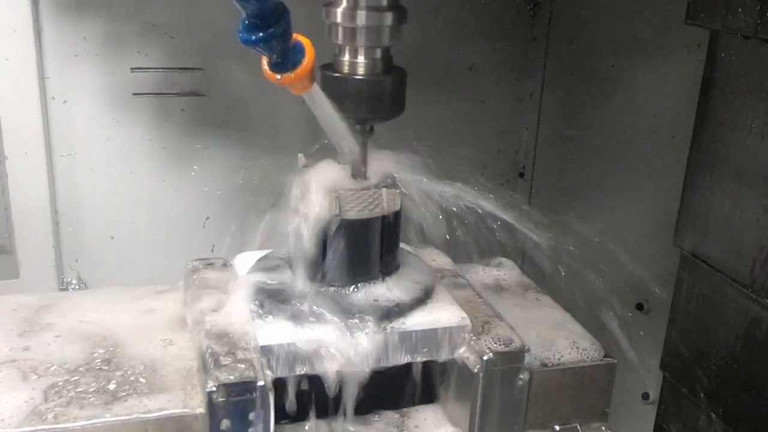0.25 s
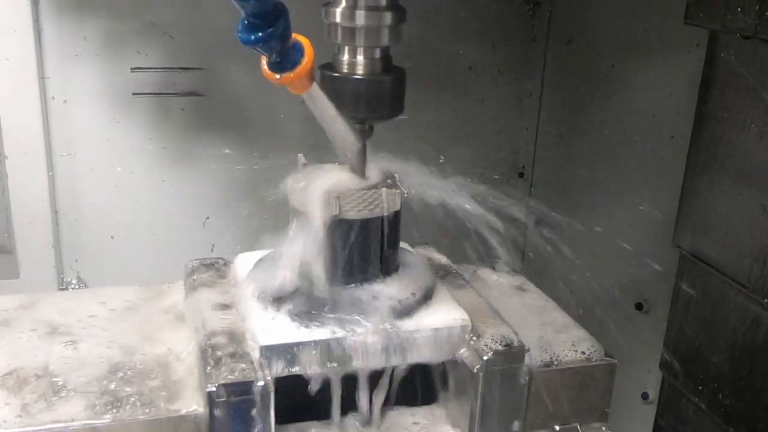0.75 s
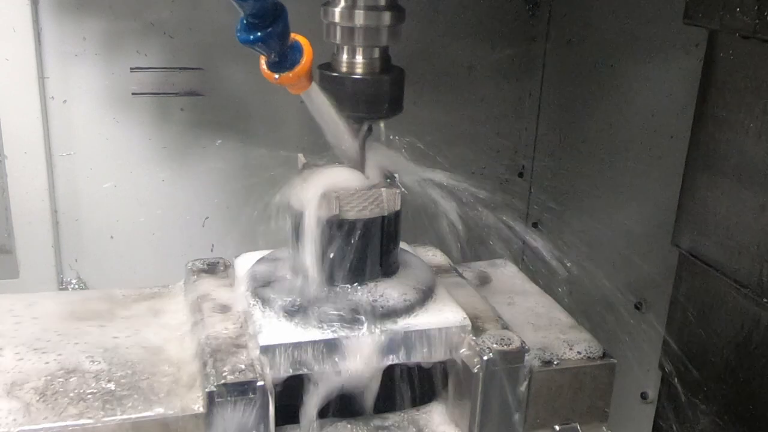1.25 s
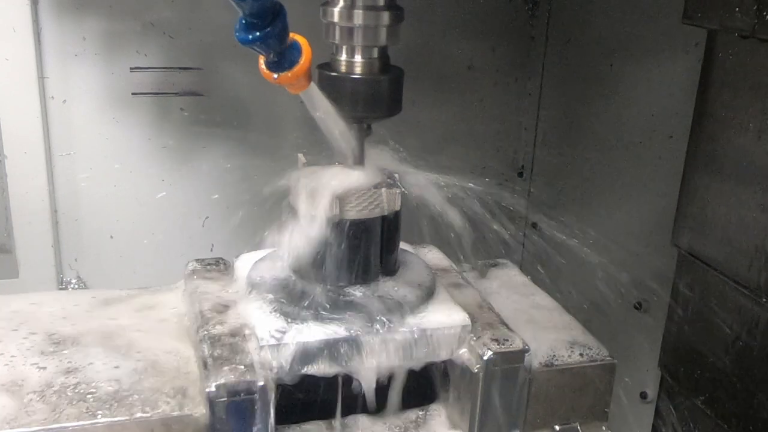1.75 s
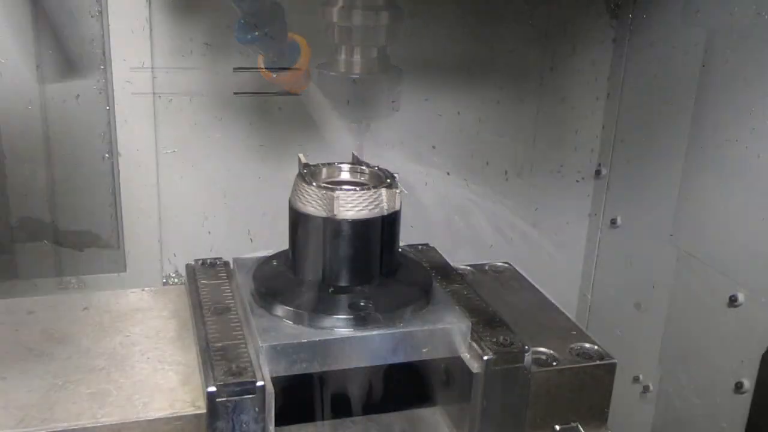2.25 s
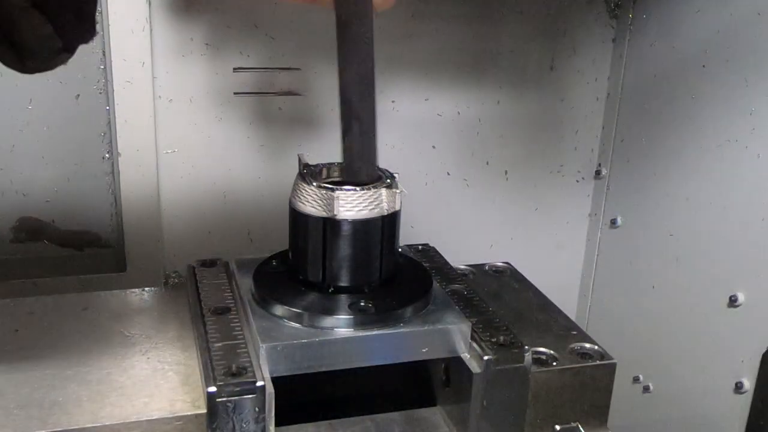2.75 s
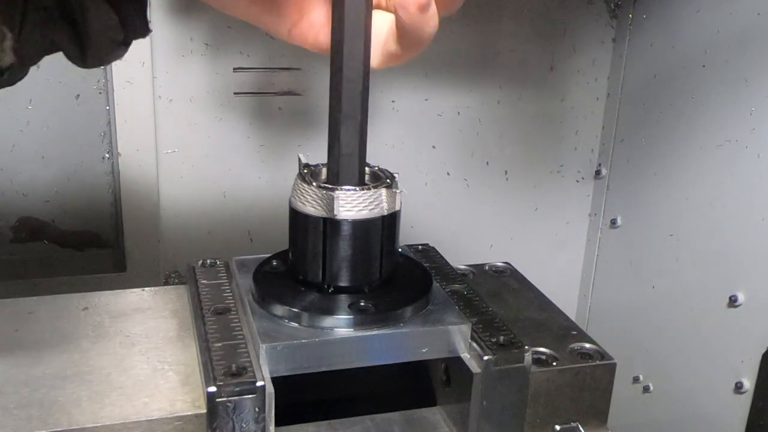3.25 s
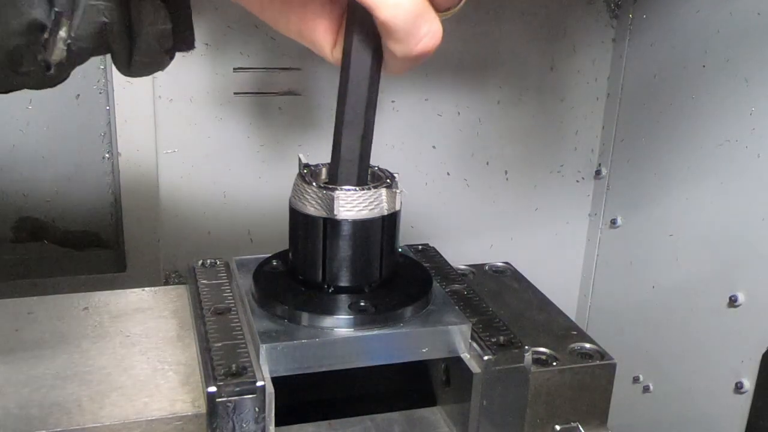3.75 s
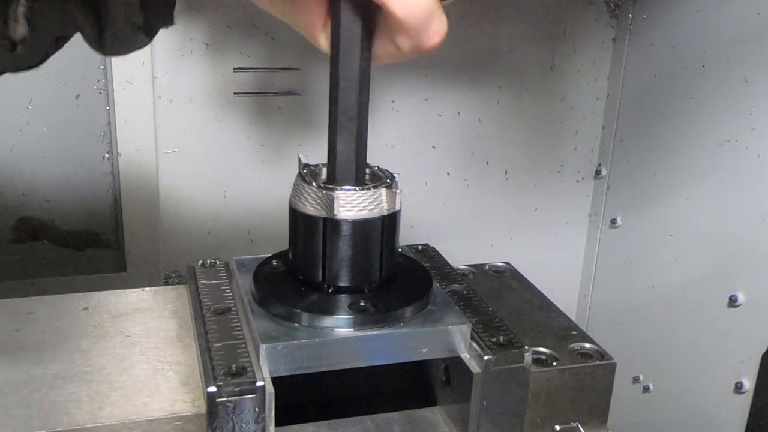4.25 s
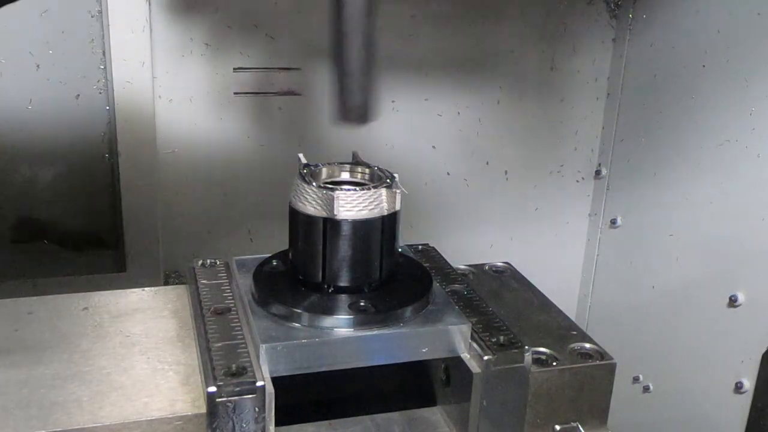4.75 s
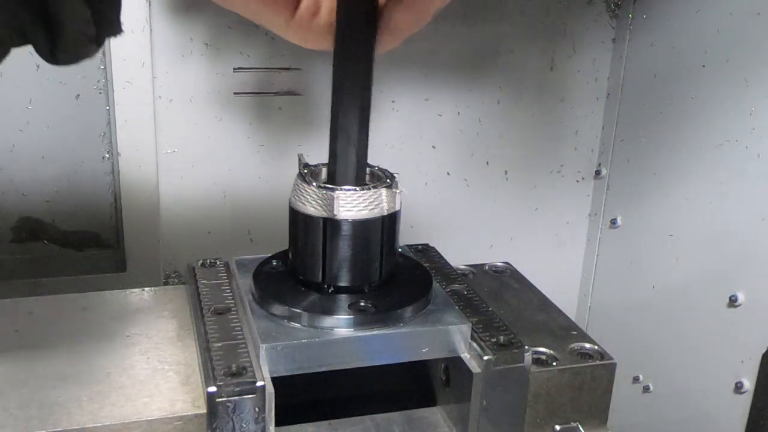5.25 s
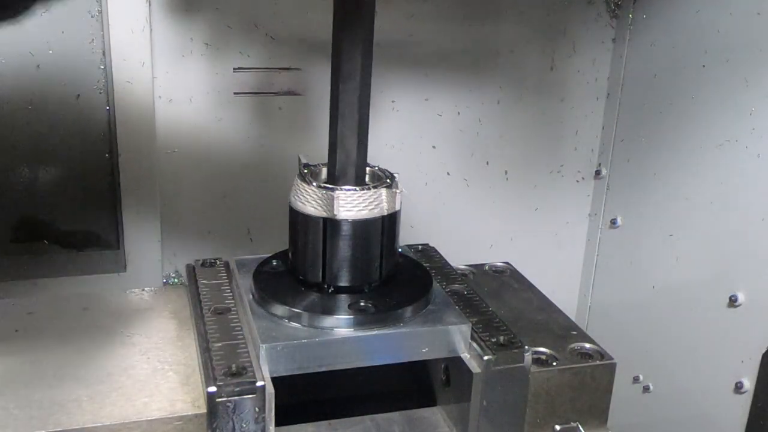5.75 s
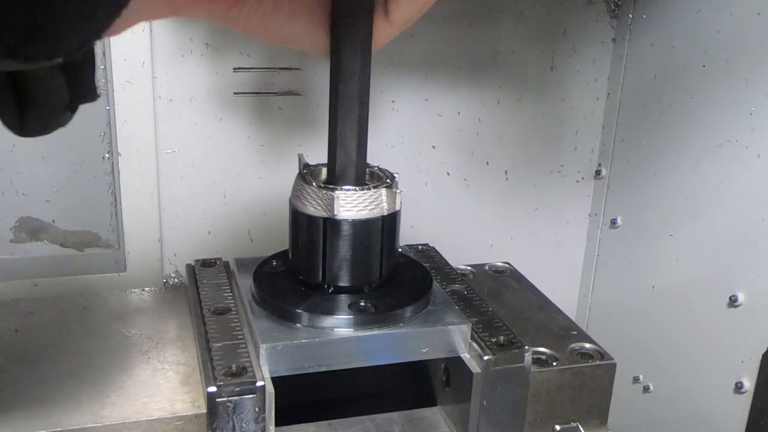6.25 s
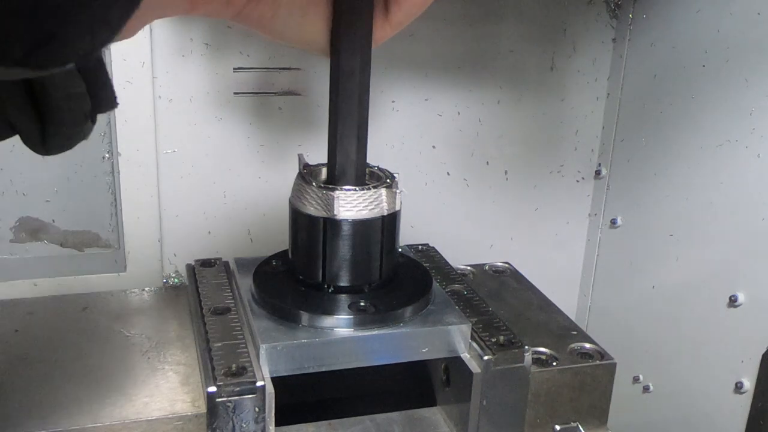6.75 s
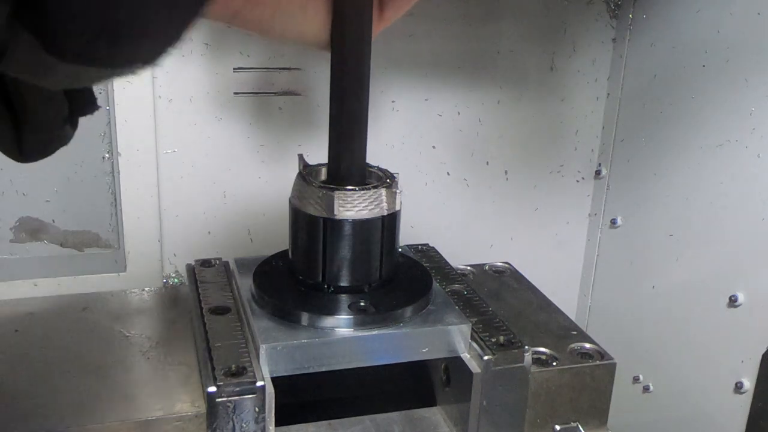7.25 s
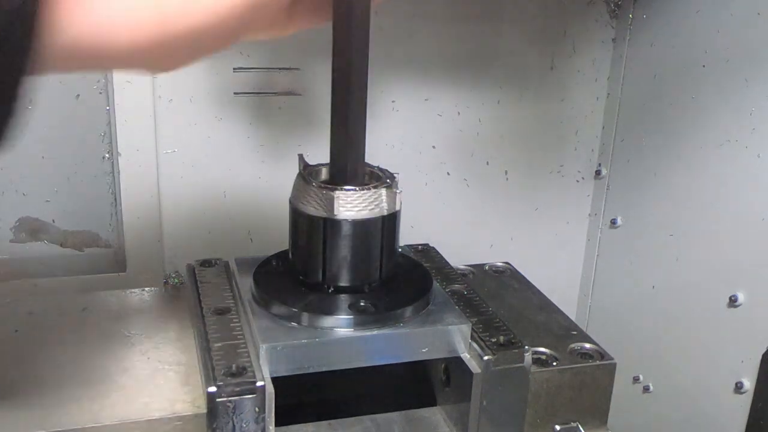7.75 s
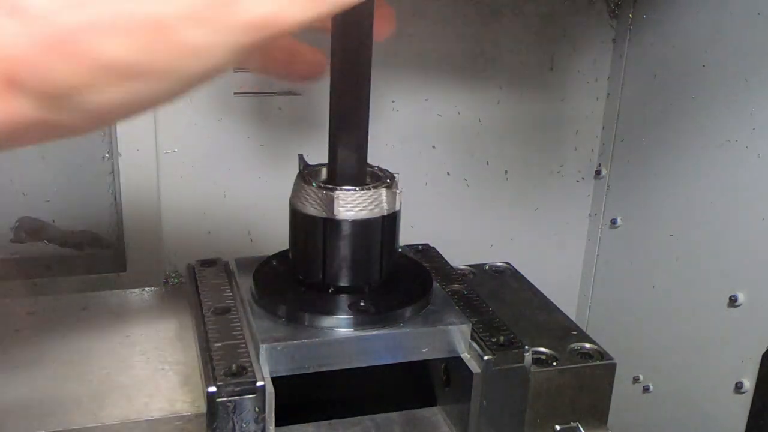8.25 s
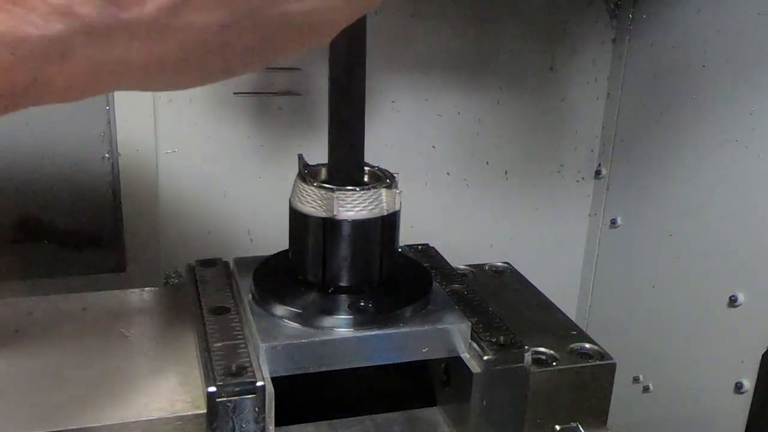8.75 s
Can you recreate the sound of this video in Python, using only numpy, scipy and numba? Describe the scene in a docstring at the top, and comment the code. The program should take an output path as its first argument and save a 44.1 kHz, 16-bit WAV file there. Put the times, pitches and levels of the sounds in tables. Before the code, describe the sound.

Inside a metal machine enclosure, a spindle sings and the cutter flutters rapidly through spraying coolant. The sound changes abruptly to whirring, bright hiss. Loud, short steel clacks and tight scrapes follow in two clusters as a key is fitted into a clamp, then sparse faint taps and rubs. Dull bumps thump throughout. The stereo microphone is close and muffled by its case, with loud hits briefly ducking the background.

```python
"""A milling machine cuts a steel part under coolant: hissing rasp, spindle tones, and a cutter mode struck every turn.
Jolts of the table thud in a camera mount and boom in sheet panels throughout; a feed axis whines as it speeds up.
The scene then switches at once to a second one, with shaped shop hiss and idle drives: a long hex key is fitted
into the clamp, its clacks and scrapes being damped modes struck by single blows and by trains of tiny slips.
A camera in a closed case hears it all; its gain control ducks each strong peak."""
import sys
import numpy as np
from scipy import signal
from scipy.fft import rfft, irfft
from scipy.io import wavfile
from scipy.ndimage import uniform_filter1d, minimum_filter1d
from numba import njit

SR = 44100
rng = np.random.default_rng(int(sys.argv[2]) if len(sys.argv) > 2 else 0)


def store_wav(level_fs):
    """Save 16-bit WAV to argv[1]."""
    pcm = np.round(np.clip(np.atleast_2d(level_fs), -1, 1) * 32767)
    wavfile.write(sys.argv[1], SR, pcm.T.astype(np.int16))


N = 397782

# rasp of the cut and the spray: freq_hz, left_db_per_hz, right_db_per_hz
RASP_SPECTRUM = [(40, -114, -106), (93, -106, -90.5), (203, -99, -102), (390, -102, -108),
                 (508, -89.5, -111), (710, -106, -103), (1034, -87, -110), (1200, -93, -98),
                 (1376, -73, -72), (1565, -64.5, -63.5), (1716, -100, -76.5), (1980, -83, -81),
                 (3380, -108, -110), (13000, -124, -126)]
# ringing of tool and part, above the rasp: freq_hz, width_hz, left_db, right_db
PART_RESONANCES = [(873, 22, 8, 5), (2585, 39, 18, 11), (2830, 140, 21, 17)]
# steady tones of the running spindle: pitch_hz, level_db
SPINDLE_TONES = [(296, -84.5), (500, -86), (894, -85), (925, -68), (980, -75.5), (1241, -71.5), (1301, -64),
                 (1350, -61.5), (1428, -56.5)]
# hiss of the shop: freq_hz, left_db_per_hz, right_db_per_hz
HISS_SPECTRUM = [(30, -114, -111), (87, -106, -100), (164, -99, -95.5), (380, -100, -101), (768, -90, -86),
                 (936, -95.5, -94), (1405, -79.5, -77.5), (1695, -69, -67), (2074, -74, -71.5),
                 (3114, -76, -80), (3565, -100, -92.5), (4520, -94.5, -108.5), (10170, -95, -97),
                 (13850, -107, -105)]
# resonances of the camera case and narrow whirring bands of the drives, above the hiss:
# freq_hz, width_hz, left_db, right_db
CASE_AND_DRIVE_BANDS = [(2017, 121, 10.5, 5.5), (2492, 59, 7.5, -2.5), (2864, 303, 6.5, 8),
                        (4307, 420, 9.5, 16), (5650, 45, 7, 7), (5887, 68, 7, 14), (5980, 730, 13.5, 12),
                        (7790, 670, 2.5, 13), (8470, 470, 7.5, 4.5), (9540, 260, 1.5, 0.5),
                        (10550, 370, 6, 9), (11300, 420, 1, -6.5), (12070, 630, -1.5, 9)]
# likeness of the two microphone ports: freq_hz, coherence (0-1)
PORT_COHERENCE = [(60, 0.2), (250, 0), (600, 0.78), (1500, 0.61), (2800, 0.97), (5600, 0.65), (10000, 0.8),
                  (14000, 0.3)]
# phase of the left port against the right: freq_hz, phase_rad
PORT_PHASE_CURVE = [(0, 0), (690, -3.4), (1210, -1.3), (1980, -4.3), (3190, -3.3), (4130, -6.9),
                    (5080, -14.3), (6120, -16.6), (7490, -10.2), (10200, -5.8), (11500, -8.2),
                    (12800, -5.0), (13500, -6.5), (14400, -6.0)]
# modes of the cutter: pitch_hz, level_db, left_over_right_db
CUTTER_MODES = [(1540.3, -27, -3.5), (2523, -57.5, 6.5)]
# jolts of the machine table that rock the camera: crest_s, level_db, loss_per_rebound_db
TABLE_JOLTS = [(0.417, -35, 18), (0.461, -39, 11), (0.853, -51, 20), (1.129, -54, 12), (2.604, -25, 39),
               (2.947, -24, 27), (3.48, -50, 25), (5.131, -28, 16), (5.396, -28, 13.5), (5.609, -38.5, 14),
               (6.21, -52, 25), (6.307, -41.5, 8), (6.559, -52, 6), (7.45, -61, 20), (7.709, -45, 18),
               (7.99, -44, 27), (8.222, -46, 20), (8.48, -58, 20), (8.69, -55, 14), (8.991, -31, 21)]
# whine of a feed axis as it speeds up: time_s, pitch_hz, level_db (before the left-right balance)
FEED_WHINE = [(0.85, 395, -82), (1.049, 452, -78), (1.27, 499, -64), (1.42, 542, -80), (1.7, 613, -84)]
# hum and whine of the idle drives: pitch_hz, left_db, right_db
DRIVE_TONES = [(280, -83, -83), (727, -77, -68), (4457, -66, -77)]
# modes of the key in the clamp: pitch_hz, swell_ms, level_db (before brightness), left_over_right_db
KEY_MODES = [(505, 5.7, -46.5, 11.5), (820, 3.2, -35, -16), (1061, 3.7, -29.5, 7), (1529, 1.95, -7, 0),
             (1640, 1.64, 4.5, -4.5), (2072, 2.1, -8.5, -35), (2510, 0.95, -30.5, 17.5),
             (2920, 0.87, -13.5, 8), (3780, 1.8, -43.5, 9), (4600, 0.99, -40, 7), (6180, 2.2, -49, -1),
             (8240, 0.098, -40, -6)]
# clacks of the key: start_s, blow_db, brightness_db_per_octave, loss_per_bounce_db
KEY_CLACKS = [(2.57, 3, -15.5, 20), (2.572, -1, 12, 16), (2.8944, 18, 7, 37), (2.9164, 9.5, 4.5, 6),
              (2.9748, 3.5, 3.5, 7.5), (3.3671, -24, -14.5, 13), (3.4457, -18.5, -4, 16),
              (3.4544, -1.5, -4, 27), (4.675, -30, -13, 9), (4.6895, -21, 11.5, 22), (5.0518, 13, 5, 22),
              (5.0678, 0, -4.5, 6), (5.09, -6, -8, 21), (5.105, 9, -1, 7.5), (5.2327, 4, -5, 4.5),
              (5.3468, 4, 0.5, 17), (5.583, -31, -20, 11), (5.7006, 2, -1.5, 18), (7.698, -25.5, -17, 18),
              (8.9623, -29, -22, 10)]
# slides of the key in the socket: start_s, length_s, right_rms_db, brightness_db_per_octave
KEY_SCRAPES = [(2.712, 0.17, -40, -22), (2.95, 0.03, -23, 0), (3.401, 0.048, -39, -17),
               (4.675, 0.019, -28.5, 4), (5.179, 0.055, -29.5, -7.5), (5.213, 0.044, -9.5, 3),
               (5.265, 0.088, -33.5, -12), (5.322, 0.064, -14, -2), (5.415, 0.057, -37.5, 3),
               (6.454, 0.15, -43, 2), (8.524, 0.12, -44.5, -7)]

CUT_END_S, TURN_S, FIRST_TURN_S = 2.16, 0.035017, 0.0228
REBOUND_S, MOUNT_HZ = 0.08, 89.8  # time between thuds of one jolt; pitch of the camera mount
BOUNCE_S, BOUNCE_SHRINK = 0.0069, 0.54  # first gap between bounces of the key; ratio of later gaps
SHANK_HZ, SHANK_DB, SHANK_T60_S = 2880, -42, 0.12  # level relative to the blow
EDGE_HZ = 14750  # upper band limit
TIME, FREQS = np.arange(N) / SR, np.fft.rfftfreq(N, 1 / SR)
LEFT = np.eye(2)[:, :1]  # picks out the left port


def amp(db):
    """Logarithmic level: decibels to amplitude gain."""
    return 10 ** (np.asarray(db) / 20)


def read(points, hz):
    """Spectral interpolation: each column of a table, read on a log-frequency axis."""
    table_hz, *columns = np.transpose(points)
    return np.array([np.interp(np.log(hz + 1), np.log(table_hz + 1), column) for column in columns])


def add(mix, start_s, sound):
    """Superposition: adds a stereo sound to the mix at the given time."""
    part = mix[:, max(round(start_s * SR), 0):][:, :sound.shape[1]]
    part += sound[:, :part.shape[1]]


def drift(rate_hz):
    """Low-passed noise: a slow random wander of unit size."""
    slow = irfft(rfft(rng.standard_normal(N)) * np.exp(-(FREQS / rate_hz) ** 2), N)
    return slow / slow.std()


def tone(hz, waver_rad):
    """Phase modulation: a sine of unit power whose phase wavers at random."""
    phase = 2 * np.pi * np.cumsum(hz * np.ones(N)) / SR
    return np.sqrt(2) * np.sin(phase + waver_rad * drift(14))


def delayed(x, ms):
    """Propagation delay: the same sound a moment later, as at the far port."""
    return np.interp(TIME - ms / 1000, TIME, x)


def noise(spectrum, humps):
    """Partial coherence: humped noise at two ports that share only part of their signal."""
    db = read(spectrum, FREQS)
    for hz, width_hz, left_db, right_db in humps:
        hump = 1 / (1 + (2 * (FREQS - hz) / width_hz) ** 2)
        db = db + np.array([[left_db], [right_db]]) * hump
    right, other = rfft(rng.standard_normal((2, N)))
    same = np.clip(read(PORT_COHERENCE, FREQS)[0], 0, 1)
    left = same * right + np.sqrt(1 - same ** 2) * other
    left = left * np.exp(1j * read(PORT_PHASE_CURVE, FREQS)[0])
    return irfft(np.array([left, right]) * amp(db), N) * np.sqrt(SR / 2)  # to dB per Hz


def cutting_rasp(throb=0.039):
    """Amplitude modulation: the rasp of cut and spray throbs once a turn."""
    bite = 1 + throb * np.cos(2 * np.pi * (TIME - FIRST_TURN_S) / TURN_S)
    return bite * noise(RASP_SPECTRUM, PART_RESONANCES)


def spindle():
    """Sum of partials: the running spindle sounds steady tones, reaching the left port late."""
    hum = sum(amp(db) * tone(hz, waver_rad=1.0) for hz, db in SPINDLE_TONES)
    return np.array([delayed(hum, ms=0.078), hum])


def shop_hiss(flutter_db=0.59):
    """Spectral shaping: hiss with humps of the camera case and whirring drives flutters slightly in level."""
    return amp(flutter_db * drift(27)) * noise(HISS_SPECTRUM, CASE_AND_DRIVE_BANDS)


def cutter():
    """Periodic excitation: a bite each turn makes the cutter's modes swell and fade at a scattered phase."""
    length_s, fullness, lag_rad = 0.035, 1.3, 1.65  # the left port lags
    uneven_db, stray_hz, slip_rad, late_s = 2.0, 9, 2.23, 0.001603  # scatter from bite to bite
    out, t = np.zeros((2, N)), np.arange(round(length_s * SR)) / SR
    swell = abs(np.sin(np.pi * t / length_s)) ** fullness
    turns = int(CUT_END_S / TURN_S) + 1
    for hz, db, left_db in CUTTER_MODES:
        for turn, (size, detune, slip, late) in enumerate(rng.standard_normal((turns, 4))):
            phase = 2 * np.pi * (hz + stray_hz * detune) * (t - length_s / 2)
            phase = phase + np.pi * turn + slip_rad * slip
            level = amp(db + uneven_db * min(size, 1) + left_db * LEFT)
            ring = level * np.sin(phase - lag_rad * LEFT)
            start_s = FIRST_TURN_S + turn * TURN_S - length_s / 2 + late_s * late
            add(out, start_s, swell * ring)
    return out


def panels(boom_db=-29, panel_hz=490, width_hz=110, lead_s=0.027, t60_s=0.31):
    """Forced resonance: sheet-metal panels boom faintly at the start of each jolt."""
    out, t = np.zeros((2, N)), np.arange(SR // 4) / SR
    band = [panel_hz - width_hz / 2, panel_hz + width_hz / 2]
    sheet = signal.butter(2, band, "bandpass", fs=SR, output="sos")
    balance_db = np.array([[3], [-3]])
    for crest_s, db, _ in TABLE_JOLTS:
        boom = signal.sosfilt(sheet, rng.standard_normal(len(t)))
        level = amp(db + boom_db - 60 * t / t60_s + balance_db)
        add(out, crest_s - lead_s, level * boom / boom.std())
    return out


def table_jolts(left_db=-14, swell_s=0.0232, sharpness=2.9, shudder_db=-18, shudder_t60_s=0.42, thuds=3):
    """Transient response: a jolt thuds in the camera mount, with weaker rebounds and an uneven shudder."""
    out, t = np.zeros((2, N)), np.arange(SR // 2) / SR
    u, pan = t / swell_s, amp(left_db * LEFT)
    thud = (u * np.exp(1 - u)) ** sharpness * np.sin(2 * np.pi * MOUNT_HZ * t)
    mount = signal.butter(2, [60, 110], "bandpass", fs=SR, output="sos")
    for crest_s, db, loss_db in TABLE_JOLTS:
        start_s = crest_s - swell_s
        shudder = signal.sosfilt(mount, rng.standard_normal(len(t)))
        level = amp(db + shudder_db - 60 * t / shudder_t60_s)
        add(out, start_s, pan * level * shudder / shudder.std())
        for rebound in range(thuds):
            add(out, start_s + rebound * REBOUND_S, pan * amp(db - rebound * loss_db) * thud)
    return out


def feed_axis():
    """Frequency glide: the feed axis whines higher as it speeds up."""
    time_s, pitch_hz, level_db = np.transpose(FEED_WHINE)
    level = amp(np.interp(TIME, time_s, level_db, -120, -120))
    whine = level * tone(np.interp(TIME, time_s, pitch_hz), waver_rad=0.27)
    return whine * amp([[3], [-4]])


def milling():
    """Superposition: all that sounds because the machine is cutting."""
    return cutter() + cutting_rasp() + spindle() + feed_axis()


def idle_drives(waver_rad_per_hz=0.00018):
    """Phase jitter: the idle drives hum and whine, higher tones wavering more."""
    return sum(amp([[left_db], [right_db]]) * tone(hz, waver_rad_per_hz * hz)
               for hz, left_db, right_db in DRIVE_TONES)


def key_ring(bright_db, scatter_hz_ms=50, lag_ms=0.18, onset=1.6, uneven_db=4.0):
    """Damped modes: the hand deadens the key in milliseconds; each contact point shifts and weights its modes."""
    age_s = np.maximum(np.arange(SR // 25) / SR - lag_ms * LEFT / 1000, 0)
    out = 0
    scatter = rng.standard_normal((len(KEY_MODES), 2))
    for (hz, swell_ms, db, left_db), (detune, weight) in zip(KEY_MODES, scatter):
        u = age_s * 1000 / swell_ms
        tilt_db = bright_db * np.log2(np.clip(hz, 900, 3600) / 1600)  # brightness pivots at 1600 Hz
        level = amp(db + uneven_db * weight + tilt_db + left_db * LEFT)
        mode_hz = hz + scatter_hz_ms * detune / swell_ms  # short-lived modes stray furthest
        out = out + level * (u * np.exp(1 - u)) ** onset * np.sin(2 * np.pi * mode_hz * age_s)
    return out


def crack(blow_db, crack_db=-62, growth=2.6, swell_ms=0.6, edge_hz=3000):
    """Nonlinear impact: the bright crack of steel on steel grows faster than the blow."""
    u = np.arange(SR // 100) / SR * 1000 / swell_ms
    highpass = signal.butter(2, edge_hz, "highpass", fs=SR)
    burst = signal.lfilter(*highpass, rng.standard_normal((2, len(u))))
    return amp(crack_db + growth * blow_db) * u * np.exp(1 - u) * burst


def clacks(rattle_db=-14, rattle_t60_s=0.042, blows=4):
    """Impulse response: a blow and ever sooner bounces, each with a fine rattle, strike the key; its shank rings on."""
    out, t = np.zeros((2, N)), np.arange(SR // 8) / SR
    shank = amp(SHANK_DB - 60 * t / SHANK_T60_S)
    shank = shank * np.sin(2 * np.pi * SHANK_HZ * t + np.pi * LEFT)  # ports in opposite phase
    for start_s, db, bright_db, loss_db in KEY_CLACKS:
        add(out, start_s, amp(db) * shank)
        add(out, start_s, crack(db))
        for bounce in range(blows):
            force = rng.standard_normal(len(t)) * amp(-60 * t / rattle_t60_s)
            force *= amp(rattle_db) / np.linalg.norm(force)
            force[0] += 1  # the blow itself, ahead of its rattle
            ring = signal.fftconvolve(force[None], key_ring(bright_db))
            add(out, start_s, amp(db - bounce * loss_db) * ring)
            start_s += BOUNCE_S * BOUNCE_SHRINK ** bounce
    return out


def scrapes(slips_per_s=2400, uneven_db=3.0):
    """Stick-slip friction: a swell of tiny, uneven slips rings the modes of the key."""
    out = np.zeros((2, N))
    for start_s, length_s, db, bright_db in KEY_SCRAPES:
        count = round(length_s * SR)
        slips = rng.standard_normal(SR) * (rng.random(SR) < slips_per_s / SR)
        slips = slips[:count] * np.hanning(count)
        slips = slips * amp(uneven_db * np.minimum(rng.exponential(1, SR), 4)[:count])
        scrape = signal.fftconvolve(slips[None], key_ring(bright_db))
        add(out, start_s, amp(db) * scrape / (scrape[1, :count].std() + 1e-9))
    return out


def scene(hiss_under_cut_db=-10.5, dull_hz=11800):
    """Superposition in time: the cut over faint dull hiss, then key work over full hiss; jolts throughout."""
    cutting = np.clip((CUT_END_S - TIME) / 0.0035, 0, 1)  # switches to the second scene
    hiss = shop_hiss()
    faint_hiss = amp(hiss_under_cut_db) * signal.lfilter(*signal.butter(2, dull_hz, fs=SR), hiss)
    background = cutting * (milling() + faint_hiss) + (1 - cutting) * (hiss + idle_drives())
    return background + panels() + table_jolts() + clacks() + scrapes()


@njit
def follow(x, rise, sink):
    """First-order lag: a follower that rises and sinks at different speeds."""
    out, level = np.zeros(len(x)), 0.
    for i in range(len(x)):
        level += (x[i] - level) * (rise if x[i] > level else sink)
        out[i] = level
    return out


def gain_control(x, threshold_db=-15, slope=0.63, recover_db_per_s=150):
    """Dynamic compression: a quick stage ducks each peak; a slow stage remembers bursts of peaks."""
    settle_s, release_s, memory = 0.25, 0.59, 0.99  # slow stage: time constants and share of the quick cut
    peak_db = 20 * np.log10(-minimum_filter1d(-abs(x).max(0), size=56) + 1e-9)
    excess_db = slope * np.maximum(peak_db - threshold_db, 0)
    fall_db = TIME * recover_db_per_s
    quick_db = np.maximum.accumulate(excess_db + fall_db) - fall_db  # instant rise, linear recovery
    slow_db = memory * follow(quick_db, 1 / (settle_s * SR), 1 / (release_s * SR))
    return x * amp(-uniform_filter1d(np.maximum(quick_db, slow_db), size=40))


def record(dry):
    """Band limitation: gain control, then a linear-phase low-pass."""
    lowpass = signal.firwin(401, EDGE_HZ, window=("kaiser", 8), fs=SR)
    return signal.oaconvolve(gain_control(dry), lowpass[None], "same")


dry = scene()
out = record(dry)
store_wav(out)
```